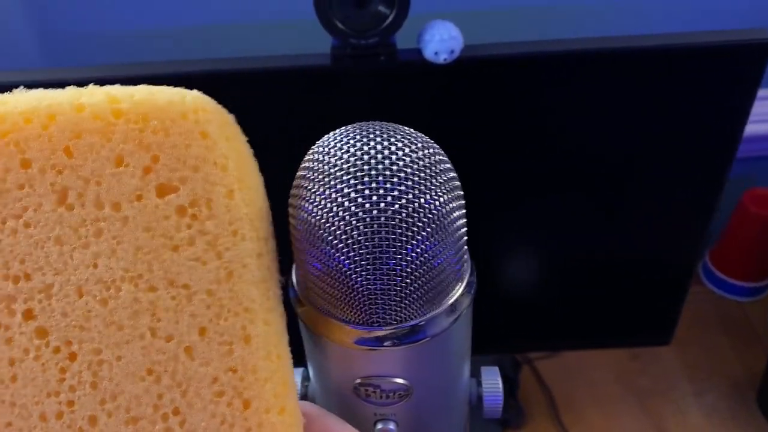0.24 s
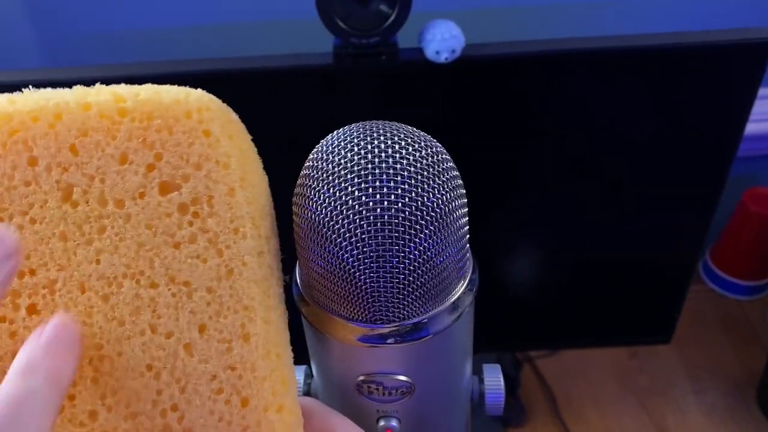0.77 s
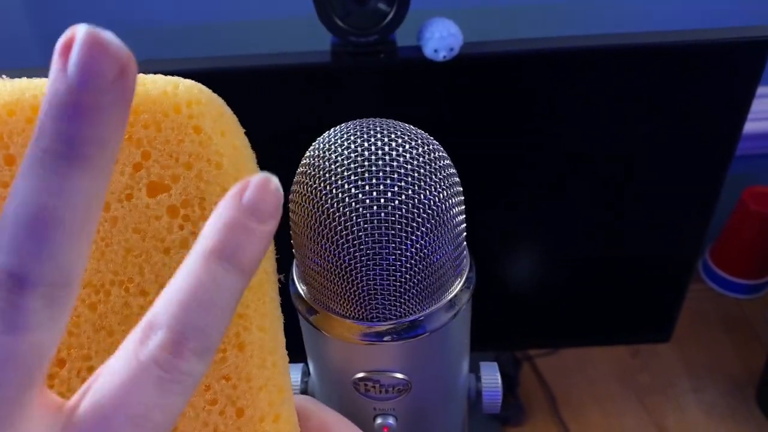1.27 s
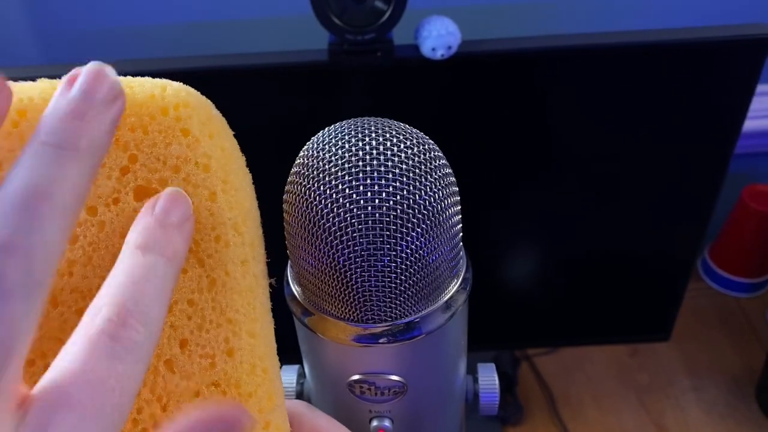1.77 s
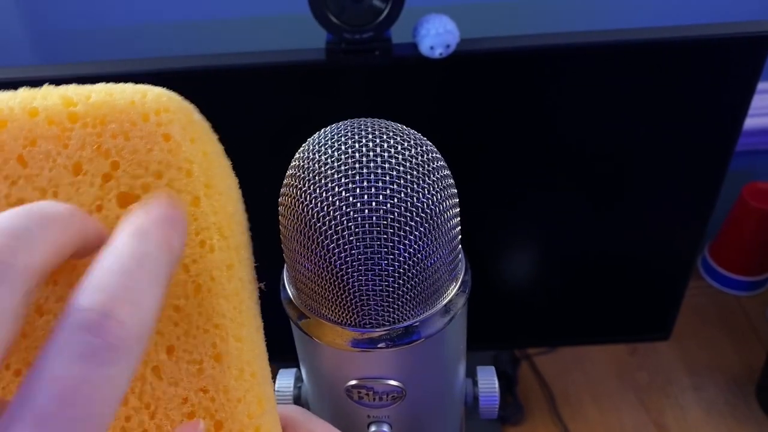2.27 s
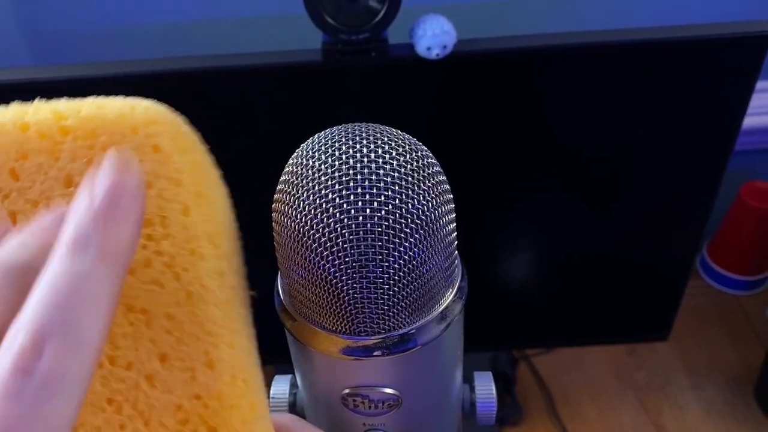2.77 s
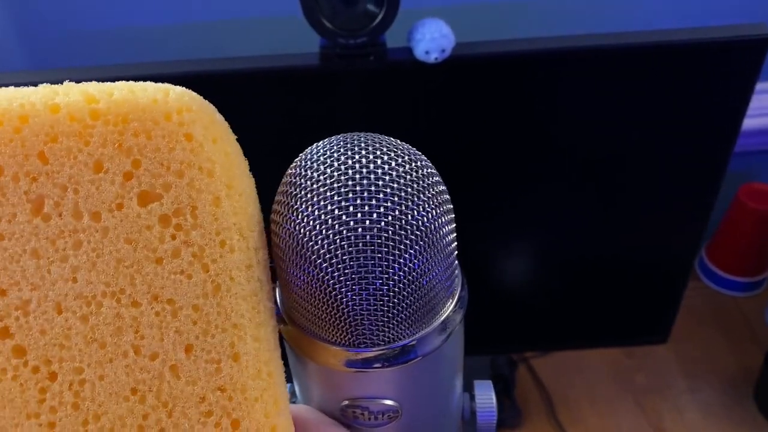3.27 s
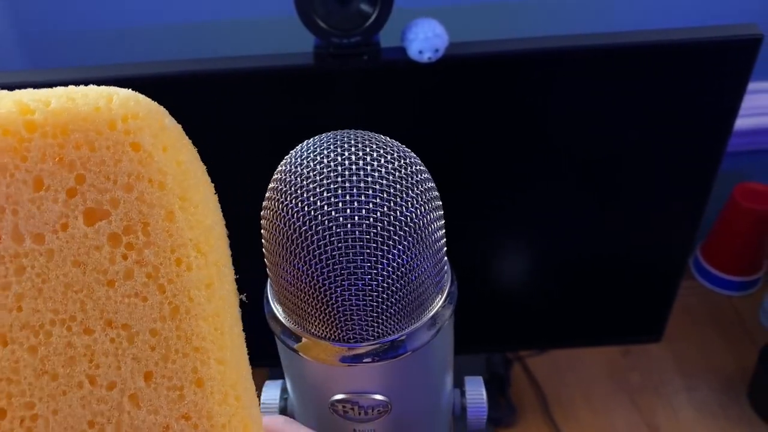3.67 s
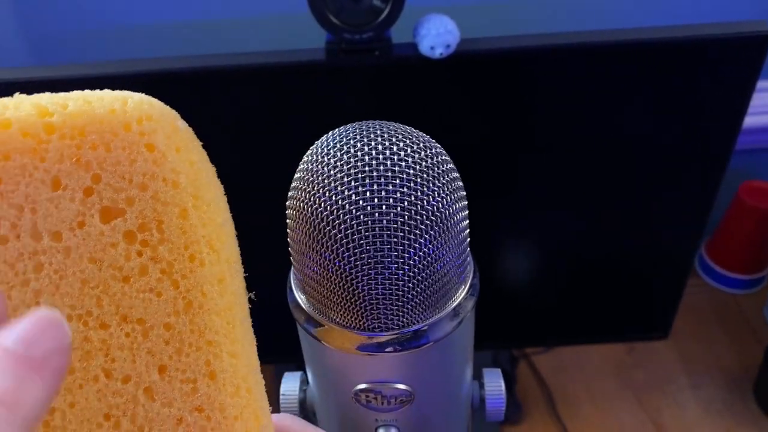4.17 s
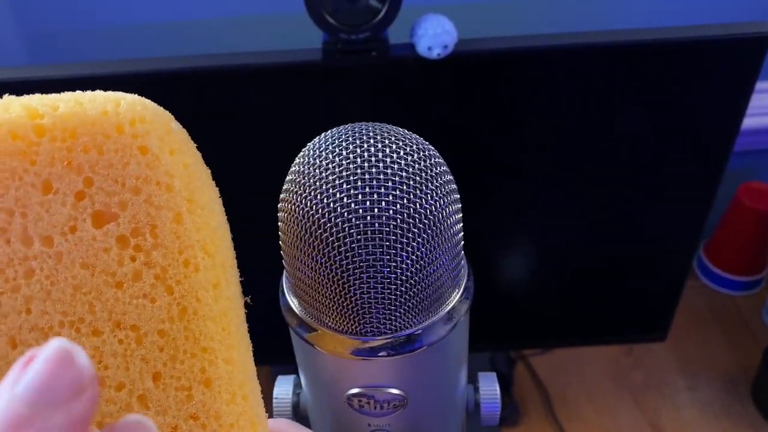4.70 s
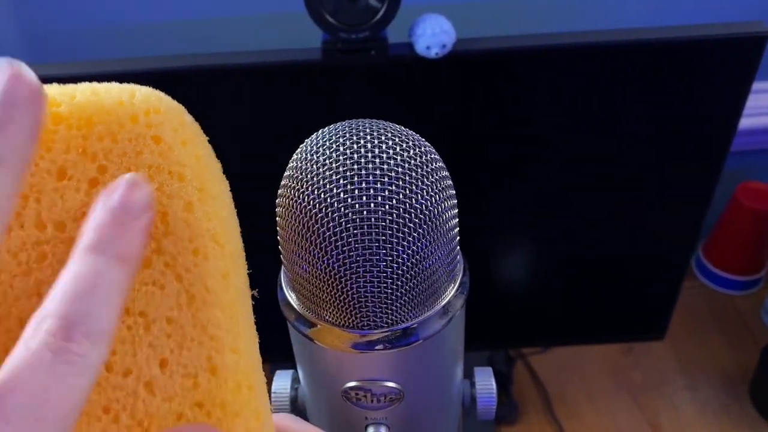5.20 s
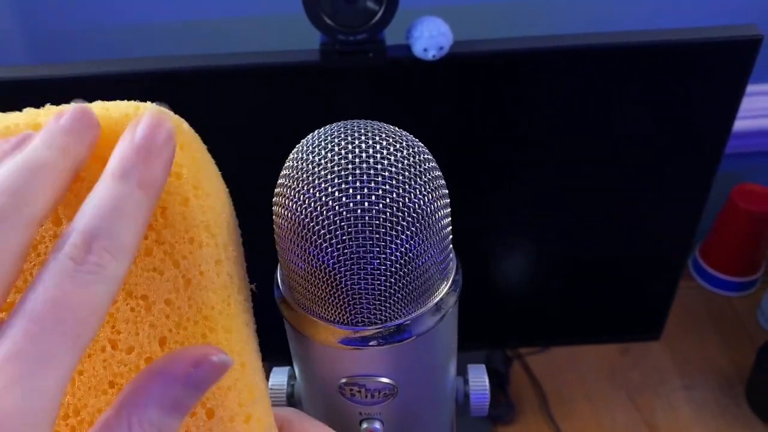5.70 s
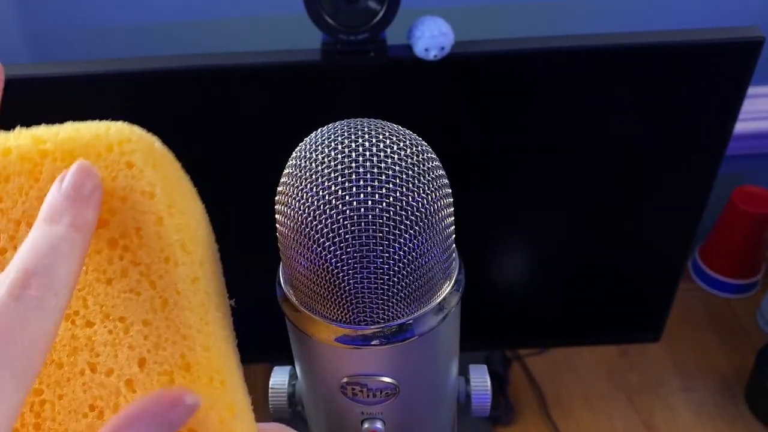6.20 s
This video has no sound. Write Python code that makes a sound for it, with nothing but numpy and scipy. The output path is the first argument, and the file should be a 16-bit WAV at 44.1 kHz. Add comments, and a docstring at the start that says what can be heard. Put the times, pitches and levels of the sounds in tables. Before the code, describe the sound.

A dry, very close stereo sound in a quiet room, with faint hiss, barely audible thin electrical tones and slow low rumbles of air from a swaying sponge. From 0.1 s fingertips tap the coarse foam about ten times a second, giving deep, soft, quickly dying thumps with tiny hollow knocks and faint rustles. Taps thin out from 1.1 to 1.9 s, with single thuds near 1.4 s. From 1.9 to 2.75 s drumming returns, stronger, with dull scuffs and gritty crackles from 2.3 s. Around 2.86 s come crisp skin scrapes, then a tiny upward swish near 3.0 s. A sparse stretch follows: a snap and thud at 3.56 s, sharp dry crackles at 4.13, 4.33 and 4.51 s, with only weak low puffs. From 5.03 s firm, boomy drumming resumes, loudest near 5.25 and 5.4 s, continuing quick and fairly even to about 6.4 s with light scuffing.

```python
"""Fingertips drum on a large coarse sponge held beside a stereo microphone in a quiet room.
Hiss with two thin tones, air pushed by the swaying sponge and a dull creep of the hand run throughout.
Taps and short cracks come in from the first tenth of a second: decaying sines thump and ring, noise bursts
crack. Slides of skin soon rustle and scuff between them as swelling noise and plucked grains; near 3 s one
swishes upward as an air gap closes. The loudest thumps are rounded off at the input."""
import sys
import numpy as np
from scipy import signal
from scipy.fft import rfft, irfft, next_fast_len
from scipy.io import wavfile
from scipy.ndimage import uniform_filter1d, map_coordinates

SR = 44100
rng = np.random.default_rng(int(sys.argv[2]) if len(sys.argv) > 2 else 0)


def waveform_to_disk(signal):
    """Save audio, clipped to [-1, 1], as 16-bit WAV at the path in sys.argv[1]."""
    frames = np.transpose(np.atleast_2d(signal))
    scaled = np.clip(frames, -1, 1) * 32767
    samples = np.round(scaled).astype(np.int16)
    wavfile.write(sys.argv[1], SR, samples)


N = 284445

# hand movement: (time [s], level [dB], left over right [dB])
SWAY_MOVES = [(0.0, -48.5, 6.5), (0.25, -35.5, 6), (0.55, -26, 2), (0.93, -32, -8.5), (1.13, -40, -6.5),
              (1.33, -56, 1.5), (1.7, -45.5, -3.5), (1.96, -31.5, -3), (2.66, -29, 3.5),
              (2.84, -37.5, -7.5), (3.1, -44.5, 13.5), (3.9, -46.5, 5.5), (4.78, -47.5, 5), (5.01, -54, 12),
              (5.17, -24.5, -5.5), (5.4, -35.5, 4.5), (5.8, -26.5, -2.5), (6.45, -34.5, 7)]
# spectrum of skin on pores: (frequency [Hz], relative density [dB per Hz])
RUSTLE_SPECTRUM = [(880, -20.5), (1500, -13.5), (2400, -7), (2900, -7.5), (4300, -8.5), (6800, -4.5),
                   (9580, -5), (15400, -5.5), (16500, -39.5)]
# spectrum of the finest pores: (frequency [Hz], relative density [dB per Hz])
SIZZLE_SPECTRUM = [(4000, -34), (8500, -3), (10500, -7), (15400, 2), (16500, -38.5)]
SIZZLE_DB = -8.5  # over the rustle or crack, before each event's own offset
SKIN_LAG_S = 2.3e-5  # extra path to the right capsule


def amp(db):
    """Gain of a level in dB."""
    return 10 ** (np.asarray(db) / 20)


def unit(x):
    """x at rms 1."""
    return x / np.sqrt(np.mean(x ** 2) + 1e-20)


def curves(rows):
    """One value per sample for each column after the time."""
    s, *cols = np.transpose(rows)
    return [np.interp(np.arange(N) / SR, s, c) for c in cols]


def wobble(rate):
    """A smooth random curve, rate knots a second."""
    return map_coordinates(rng.standard_normal(int(N * rate / SR) + 4), [np.arange(N) * rate / SR])


def filtered(x, response):
    """x times a response of frequency."""
    m = next_fast_len(N + SR // 2)
    return irfft(rfft(x, m) * response(np.fft.rfftfreq(m, 1 / SR)), m)[..., :N]


def coloured(x, spectrum):
    """x through (Hz, dB) points on a log axis, scaled so that white noise keeps its rms."""
    f, db = np.transpose(spectrum)

    def response(hz):
        return unit(amp(np.interp(np.log(hz + 1), np.log(f + 1), db, left=-120, right=-120)))

    return filtered(x, response)


def pair(alike):
    """White stereo noise with correlation alike between the channels."""
    a, b = rng.standard_normal((2, N))
    turn = np.arccos(np.clip(alike, -1, 1)) / 2
    shared, apart = np.cos(turn) * a, np.sin(turn) * b
    return np.array([shared + apart, shared - apart])


def sides(pan_db):
    """Left and right gain of a level difference."""
    return amp(np.array([pan_db, -pan_db]) / 2)


def add(out, s, sound):
    """Mix sound into out from time s."""
    part = out[..., round(s * SR):round(s * SR) + sound.shape[-1]]
    part += sound[..., :part.shape[-1]]


def room():
    """Steady coloured hiss and two thin electrical tones of slightly wavering level."""
    # (frequency [Hz], relative density [dB per Hz])
    hiss_spectrum = [(20, -45.5), (220, -3), (350, -13.5), (1070, -14.5), (2080, -18.5), (12500, -22.5),
                     (14500, -24), (16500, -32.5)]
    # (frequency [Hz], nominal rms level [dB])
    whine_tones = [(1066, -94), (14034, -90.5)]
    hiss_db = -77
    t = np.arange(N) / SR
    tones = sum(np.sqrt(2) * amp(db + 0.81 * wobble(24)) * np.sin(2 * np.pi * hz * t)
                for hz, db in whine_tones)
    return amp(hiss_db) * coloured(pair(0.1), hiss_spectrum) + tones


def sway():
    """Slow lumps of air pushed by the held sponge, unlike at the two capsules."""
    # (frequency [Hz], relative density [dB per Hz])
    air_spectrum = [(6, -35.5), (11, -8.5), (22, -3.5), (36, -19), (50, -10), (75, -26.5), (140, -37.5),
                    (250, -47.5), (400, -93.5)]
    level_db, pan_db = curves(SWAY_MOVES)
    lumps_db = 2.6 * wobble(3.2) + 3.17 * np.array([wobble(17), wobble(23)])
    air = unit(amp(lumps_db) * coloured(pair(0.45), air_spectrum))
    return amp(level_db) * sides(pan_db) * air


def capsules(dry, alike, lag_s):
    """A source to the left: the right capsule hears it weaker, a little later and duller at the top."""
    # far capsule: (frequency [Hz], gain [dB])
    shade = [(100, -3.5), (3000, -2), (8000, -3), (16500, -5)]
    left, right = dry * pair(alike)
    f, db = np.transpose(shade)
    far = filtered(right, lambda hz: amp(np.interp(hz, f, db)) * np.exp(-2j * np.pi * hz * lag_s))
    return np.array([left, far])


def swells():
    """Rustle, scuff and sizzle strength: slides swell and fade by one rule over the hand's dull creep."""
    # skin sliding over pores:
    # (nominal middle [s], half length [s], rustle level [dB], dull scuff over rustle [dB])
    slides = [(0.398, 0.014, -67, -1.5), (0.586, 0.0054, -66, 0), (0.753, 0.017, -73, 6),
              (0.795, 0.034, -67.5, 1), (0.955, 0.011, -57.5, 1.5), (1.106, 0.013, -64.5, -0.5),
              (1.844, 0.055, -63, 7), (1.937, 0.02, -61.5, 10.5), (2.017, 0.0074, -60.5, 12.5),
              (2.059, 0.013, -69.5, 9), (2.125, 0.017, -62.5, 5), (2.157, 0.0082, -64, 14.5),
              (2.219, 0.025, -64.5, 6.5), (2.316, 0.012, -71, 5.5), (2.348, 0.022, -55.5, 8),
              (2.401, 0.006, -53, 4), (2.492, 0.013, -61, 8.5), (2.559, 0.018, -55.5, 9),
              (2.584, 0.017, -62.5, 13.5), (2.673, 0.054, -62.5, 8), (2.758, 0.013, -65, 8),
              (2.858, 0.0058, -55, -5), (2.873, 0.0089, -54, -22.5), (2.993, 0.042, -52, -31),
              (3.028, 0.0091, -47, -42), (3.565, 0.011, -47.5, 5.5), (3.612, 0.026, -61, -14.5),
              (3.967, 0.021, -67, -50), (4.129, 0.015, -53.5, -3.5), (4.152, 0.022, -52, -9),
              (4.238, 0.011, -57.5, -16.5), (4.332, 0.0024, -41, -17), (4.355, 0.013, -53, -7),
              (4.427, .021, -58.5, -14), (4.512, 0.0061, -47, -15), (4.54, 0.017, -49, -12),
              (4.793, 0.027, -61.5, -40), (5.073, 0.0033, -58, 4.5), (5.129, 0.012, -59.5, 4.5),
              (5.235, 0.015, -61.5, -1.5), (5.399, 0.02, -60, 10.5), (5.453, .012, -64, -5),
              (5.524, 0.058, -76, -8), (5.627, 0.039, -68.5, -0.5), (5.704, 0.029, -64.5, 7.5),
              (5.75, 0.0058, -65.5, 4), (5.846, 0.05, -67.5, -1), (5.918, 0.013, -69, -0.5),
              (6.054, 0.021, -67, -1), (6.096, 0.018, -67, 2), (6.199, 0.043, -63.5, 2),
              (6.313, 0.035, -69, 7.5), (6.395, 0.069, -64.5, -3)]
    rise_share = .55  # rise time over half length
    settle_db, settle_s = -27.5, 0.11  # the foam creeps faintly around each slide
    creep_db, creep_ref_db = -75, -34  # creep level at this level of hand movement
    creep_grows = 0.57  # dB per dB of movement
    sizzle_per_scuff = -0.28  # dB per dB of scuff
    t, fine, bright = np.arange(N) / SR, np.zeros(N), np.zeros(N)
    coarse = amp(creep_db + creep_grows * (curves(SWAY_MOVES)[0] - creep_ref_db))
    for s, half, db, dull_db in slides:
        near = slice(max(round(s * SR) - SR // 2, 0), round(s * SR) + SR // 2)
        peak = s - (1 - rise_share) * half / 2
        off = np.abs(t[near] - peak)
        width = half * np.where(t[near] < peak, rise_share, 2 - rise_share)
        swell = amp(db - 12.8 * (off / width) ** 1.26)
        slide = swell + amp(db + settle_db - 7.8 * off / settle_s)
        fine[near] += slide
        bright[near] += amp(SIZZLE_DB + sizzle_per_scuff * dull_db) * slide
        coarse[near] += amp(dull_db) * swell
    return fine, coarse, bright


def patchy(x, depth_db):
    """x with random gain patches, several hundred hertz by some hundredths of a second."""
    z = signal.stft(x, nperseg=256)[2]
    field = uniform_filter1d(rng.standard_normal(z.shape[-2:]), size=5, axis=0)
    field = uniform_filter1d(field, size=6, axis=1)
    return signal.istft(z * amp(depth_db * unit(field)), nperseg=256)[1][..., :N]


def grit(strength, count=3000):
    """Single pores pluck at random moments, each a few cycles at its own pitch and place."""
    base_db, spread_db = -10.5, 4  # gain on strength; scale of the random excess above it
    median_hz, spread_octaves, decay_cycles = 2220, .9, 2.37
    when, size = rng.uniform(size=(2, count))
    pitch, place = rng.standard_normal((2, count))
    start, k = (when * N).astype(int), np.arange(256)
    hz = np.clip(median_hz * 2 ** (spread_octaves * pitch), 400, 12000)
    cycles = hz[:, None] * k / SR
    gain = strength[start] * amp(base_db - spread_db * np.log(size))
    pluck = cycles * np.exp(-3 * cycles / decay_cycles) * np.sin(2 * np.pi * cycles)
    grains = gain[:, None] * pluck
    at = (start[:, None] + k).ravel()
    return np.array([np.bincount(at, (g[:, None] * grains).ravel(), N + 256)[:N]
                     for g in sides(1.4 + 4 * place)])


def strokes():
    """Pores catch and let go in dense uneven grains that swell and fade with each slide of the skin."""
    # (frequency [Hz], relative density [dB per Hz])
    scuff_spectrum = [(20, -28.5), (300, 4.5), (800, -7.5), (2500, -15.5), (6000, -29.5)]
    fine, coarse, bright = swells()
    clumps = amp(1.7 * wobble(60) + 1.5 * wobble(250))
    grains = unit(clumps * amp(2.2 * rng.exponential(size=N)))
    rustle = coloured(capsules(fine * grains, 0.67, SKIN_LAG_S), RUSTLE_SPECTRUM)
    sizzle = coloured(capsules(bright * grains, 0.8, SKIN_LAG_S), SIZZLE_SPECTRUM)
    rough = unit(clumps * amp(2.5 * wobble(400)))
    scuff = coloured(coarse * rough * pair(0.011), scuff_spectrum)
    return patchy(rustle + sizzle + scuff, depth_db=2.5) + grit(fine + 0.1 * coarse)


def taps(slab_hz=82, share=0.83, slow=0.3, slow_db=-12):
    """Pressed foam springs back in a swing or two that soon dies; it knocks and the landing skin puffs."""
    # finger taps, and the low puffs of three scratches after 4 s:
    # (time [s], contact level [dB], thump level [dB], nominal bounce [Hz], left over right [dB])
    thump_rows = [(0.088, -29, -15.5, 169.7, -5.5), (0.096, -30.5, -10.5, 68.3, -5.5),
                  (0.188, -40.5, -23, 111, 4), (0.198, -41.5, -11, 70, 0), (0.286, -47.5, -45, 108, -2),
                  (0.293, -45.5, -15.5, 61.5, -6), (0.386, -48.5, -16, 67, 0.5), (0.434, -49, -49, 110, -5),
                  (0.44, -45, -16, 61, -4), (0.512, -40.5, -28.5, 44.5, -11.5),
                  (0.545, -33.5, -10.5, 46.7, 0), (0.634, -35, -11.5, 45.1, -8.5),
                  (0.75, -42, -12.5, 47.4, -8.5), (0.825, -46, -21, 53.6, -17.5),
                  (0.943, -50.5, -16.5, 70.3, -8.5), (1.014, -35, -12.5, 85.3, -3.5),
                  (1.069, -35.5, -14, 84.5, 0.5), (1.343, -51.5, -24, 49.7, -27),
                  (1.365, -47, -14.5, 89.5, -0.5), (1.424, -26.5, -11, 94.6, -2.5),
                  (1.555, -61, -21, 51, 2.5), (1.726, -65.5, -35, 43.5, -10), (1.812, -42, -15.5, 59, 7.5),
                  (1.945, -55, -13, 64.5, -5.5), (2.009, -40.5, -48, 46.8, -7.5),
                  (2.055, -28, -14.5, 67.3, -12.5), (2.156, -46, -14.5, 68.7, -3.5),
                  (2.227, -44.5, -14.5, 59, -3.5), (2.287, -44, -32, 63.5, -4), (2.32, -47, -19, 65, -9.5),
                  (2.404, -41, -13, 68, 1), (2.467, -32.5, -12.5, 73, -2), (2.575, -38, -7, 74.4, -2),
                  (2.652, -34, -12, 81, 1.5), (2.731, -21.5, -8.5, 80, 2.5), (2.85, -54.5, -34.5, 81, 15),
                  (3.022, -56, -40, 40.7, -6), (3.556, -50, -19, 101.5, 3.5),
                  (3.564, -43.5, -14.5, 46.6, -10), (4.126, -28.5, -32.5, 56.7, 0.5),
                  (4.323, -30, -31.5, 45, 8), (4.51, -32, -27.5, 88, -0.5), (5.036, -31, -13, 63.6, -4),
                  (5.109, -22.5, -10.5, 71.4, -7.5), (5.155, -59, -34, 44, -20),
                  (5.189, -28, -14.5, 81, -10), (5.249, -52, -25.5, 59, -25.5),
                  (5.254, -20.5, -7.5, 67.4, -2.5), (5.299, -36, -13.5, 86.4, -1),
                  (5.395, -21.5, -7.5, 75, -1.5), (5.471, -38.5, -13, 90.4, -1.5),
                  (5.542, -57, -23, 54.5, -17), (5.586, -40.5, -14, 87.5, -2.5),
                  (5.68, -30, -11.5, 69, -2.5), (5.751, -39.5, -12.5, 94, -1), (5.828, -33, -12, 74.5, -1),
                  (5.897, -37.5, -15, 81, -2.5), (5.968, -38.5, -12.5, 78.5, -1.5),
                  (6.034, -43.5, -14, 81, 3), (6.109, -46.5, -17.5, 45.5, -3), (6.171, -39.5, -14, 98, -4),
                  (6.267, -57.5, -25.5, 64.6, -16), (6.281, -45.5, -12, 74, -3.5),
                  (6.363, -55.5, -16.5, 75.4, 3.5)]
    # the foam's hollow knock: (centre frequency [Hz], mean level over contact [dB], 60 dB decay [s])
    knock_modes = [(265, -9.5, 0.0067), (410, -15.5, 0.0055), (733, -9.5, 0.01), (2170, -23, 0.0091)]
    # skin contact: (frequency [Hz], relative density [dB per Hz])
    contact_spectrum = [(20, -51.5), (170, 11.5), (330, -16.5), (700, -11), (1500, -24), (3000, -36),
                        (8000, -38)]
    bounce_cycles, damping, puff_t60_s = .55, 1.4, .045
    knock_spread = 0.15  # log pitch scatter from tap to tap
    knock_after_s = .0045  # until the foam is squeezed
    thump, landing, t = np.zeros((2, N)), np.zeros((2, N)), np.arange(SR // 8) / SR
    chance = rng.standard_normal((len(thump_rows), 2 + 3 * len(knock_modes)))
    for (s, contact_db, thump_db, hz, pan_db), (a, b, *c) in zip(thump_rows, chance):
        pan = sides(pan_db)[:, None]
        # the louder capsule gets the dent under the finger, the other mostly the slab's own mode
        far_hz = hz + share * (slab_hz - hz)
        u = t * np.array([[hz], [far_hz]] if pan_db > 0 else [[far_hz], [hz]])
        # squeezed foam stiffens: the first swing is quick and pointed, the later ones slower
        turn = 2 * np.pi * (u + 0.14 * (1 - np.exp(-u / 1.77)) - 0.038 * u)
        attack = 1 - np.exp(-(u / 0.091) ** 2)
        decay = u / bounce_cycles * np.exp(1 - (u / bounce_cycles) ** damping)
        bounce = attack * decay * (np.sin(turn) - 0.0073 * np.cos(2 * turn))
        # the whole sponge rocks more slowly, toward one capsule and away from the other
        v = t * slab_hz * np.exp(0.071 * a)
        rock = amp(slow_db) * np.sign(b) * v * np.exp(-v / 1.5) * np.sin(2 * np.pi * slow * v)
        # the slab's mode lingers faintly, at a pitch scattered from tap to tap
        linger = amp(-10.0 - 60 * t / 0.14) * (1 - np.exp(-t / 0.022))
        linger = linger * np.sin(2 * np.pi * slab_hz * np.exp(.15 * b) * t)
        add(thump, s, amp(thump_db) * (pan * bounce + [rock, -rock] + linger))
        knock = 0
        for (f, db, t60_s), p, q, r in zip(knock_modes, c[::3], c[1::3], c[2::3]):
            envelope = amp(db + 2.8 * p - 60 * t / t60_s) * (1 - np.exp(-t * f * 1.2))
            mode = np.sin(2 * np.pi * f * np.exp(knock_spread * q) * t)
            knock = knock + sides(6 * r)[:, None] * envelope * mode
        add(thump, s + knock_after_s, amp(contact_db) * pan * knock)
        puff = (1 - np.exp(-t / 0.0068)) * amp(-60 * t / puff_t60_s)
        add(landing, s, amp(contact_db) * pan * puff)
    return thump + coloured(landing * pair(0.066), contact_spectrum)


def cracks():
    """Short noise cracks with a rough ring, in the rubbing or on a tap; the low ones knock hollow."""
    # (time [s], nominal crack level [dB], ring level per unit partial [dB], ring [Hz])
    crack_rows = [(.088, -54.5, -44.5, 2100), (.104, -56.5, -51, 1120), (.187, -56.5, -46.5, 2090),
                  (.287, -69.5, -63.5, 2100), (.378, -76, -54.5, 2200), (.394, -60, -56, 1940),
                  (.514, -55.5, -59.5, 2180), (.549, -55, -37, 782), (.587, -60.5, -56, 1620),
                  (.635, -60, -55, 2140), (.655, -59.5, -65, 2230), (.749, -65.5, -54, 1280),
                  (.95, -53, -48.5, 766), (1.423, -49, -42.5, 726), (1.95, -51, -44, 800),
                  (2.01, -55, -62, 2830), (2.342, -44, -40, 850), (2.466, -49.5, -43, 714),
                  (2.487, -49, -52, 1230), (2.529, -41, -47, 900), (2.558, -36, -47, 2750),
                  (2.58, -44, -34, 1300), (2.661, -40, -52, 3900), (2.718, -45.5, -47, 970),
                  (2.735, -50.5, -55, 1020), (2.858, -41, -58, 4430), (2.871, -41.5, -41.5, 2550),
                  (2.883, -39.5, -60, 4470), (3.034, -39, -32.5, 7180), (3.556, -35.5, -49, 2900),
                  (4.126, -25.5, -57, 2850), (4.133, -29.5, -53, 2600), (4.153, -31, -52, 3660),
                  (4.33, -34, -60, 3240), (4.511, -21.5, -39, 2880), (4.54, -38, -58, 4550),
                  (5.036, -50, -49, 825), (5.069, -60, -58, 2210), (5.116, -52, -37.5, 1110),
                  (5.191, -49, -55, 960), (5.262, -42.5, -47, 1530), (5.4, -50, -45, 1200),
                  (5.452, -61.5, -60, 1160), (5.751, -56, -50, 1500), (5.922, -56, -61, 1210),
                  (6.031, -56.5, -59, 1010), (6.17, -51.5, -55, 2230)]
    crack_t60_s, ring_t60_s, ring_rise_s = .01, .012, 0.00042
    sizzle_db_per_octave = 3  # of ring pitch above 2 kHz
    crack, sharp, ring = np.zeros(N), np.zeros(N), np.zeros(N)
    t = np.arange(SR // 50) / SR
    detunes = rng.uniform(0.066, 0.65, (len(crack_rows), 2))
    for (s, db, ring_db, hz), (below, above) in zip(crack_rows, detunes):
        burst_db = db - 5 - 60 * t / crack_t60_s
        add(crack, s, amp(burst_db))
        add(sharp, s, amp(burst_db + SIZZLE_DB + sizzle_db_per_octave * np.log2(hz / 2000)))
        partials = sum(g * np.sin(2 * np.pi * hz * k * t)
                       for k, g in [(1, 1), (1 - below, .3), (1 + above, .3)])
        add(ring, s, amp(ring_db - 60 * t / ring_t60_s) * (1 - np.exp(-t / ring_rise_s)) * partials)
    bursts = coloured(capsules(crack, 0.5, SKIN_LAG_S), RUSTLE_SPECTRUM)
    sizzle = coloured(capsules(sharp, 0.5, SKIN_LAG_S), SIZZLE_SPECTRUM)
    return bursts + sizzle + ring * sides(1.9)[:, None]


def swish(knots_per_s=550):
    """The gap between finger and foam gives the slide a noise band that climbs and fades as it closes."""
    from_s, closes_s, shut_s = 2.866, 2.985, 3.04
    start_hz, climb_hz_per_s = 2420, 45000
    level_db, fade_db_per_s = -8.5, 120  # level over the rustle
    t = np.arange(N) / SR
    closing_s = np.maximum(t - closes_s, 0)
    inside = (t > from_s) & (t < shut_s)
    hz = np.minimum(start_hz + climb_hz_per_s * closing_s, SR / 4)
    phase = 2 * np.pi * np.cumsum(hz) / SR
    band = unit(wobble(knots_per_s) * np.cos(phase) + wobble(knots_per_s) * np.sin(phase))
    gain = amp(level_db - fade_db_per_s * closing_s)
    return inside * swells()[0] * gain * band * sides(1.2)[:, None]


def scene():
    """All sources at the two capsules."""
    return room() + sway() + strokes() + taps() + cracks() + swish()


def record(dry):
    """The input rounds off the loudest thumps at its ceiling; nothing passes above the band limit."""
    ceiling, top_hz = .284, 16450
    x = dry / (1 + np.abs(dry / ceiling) ** 6) ** (1 / 6)
    ends = np.linspace(x[:, 0], x[:, -1], N, axis=1)  # held apart so that the filter meets no step
    return ends + filtered(x - ends, lambda hz: hz < top_hz)


dry = scene()
out = record(dry)
waveform_to_disk(out)
```